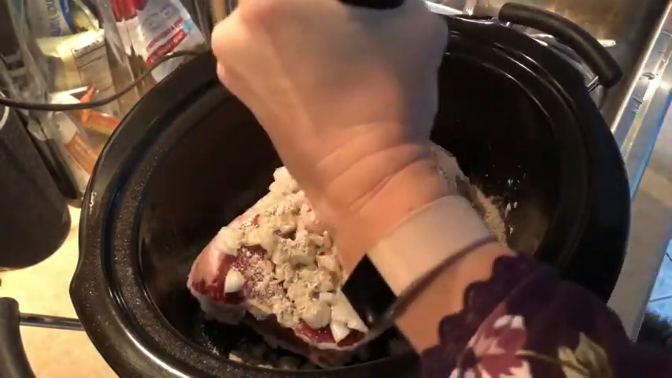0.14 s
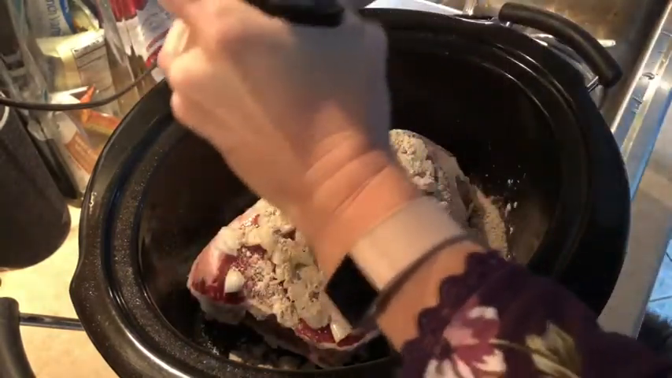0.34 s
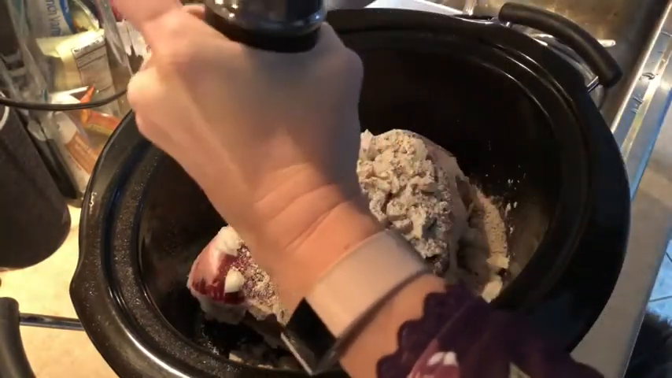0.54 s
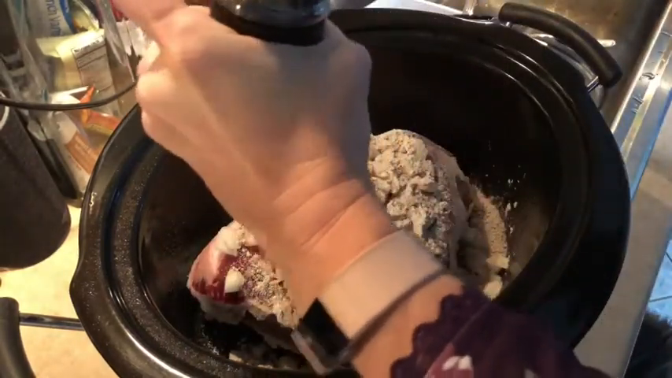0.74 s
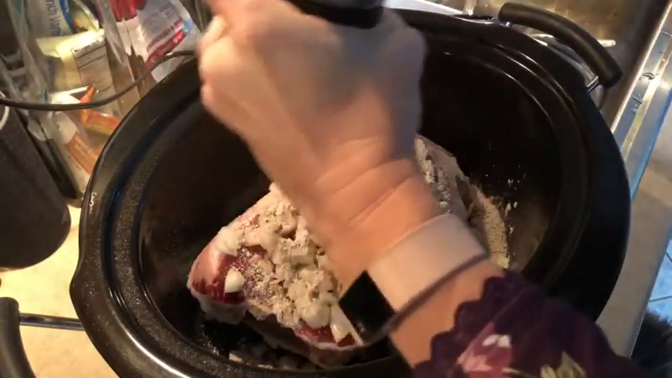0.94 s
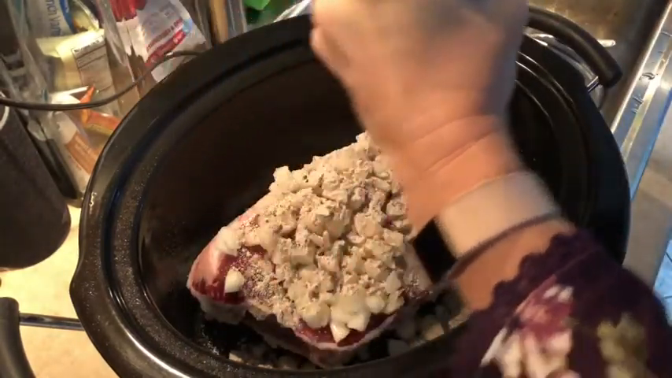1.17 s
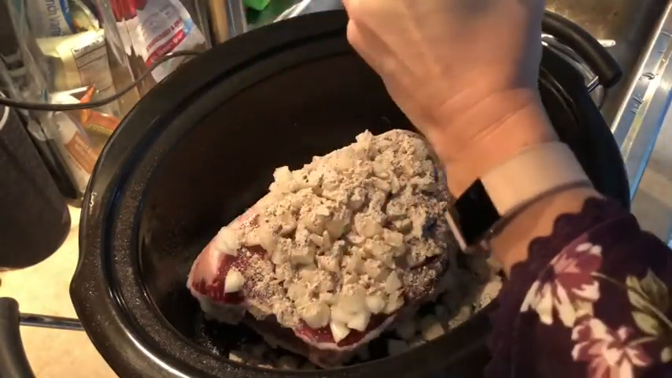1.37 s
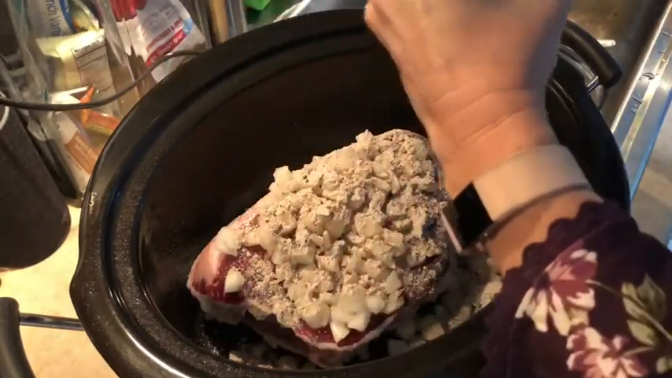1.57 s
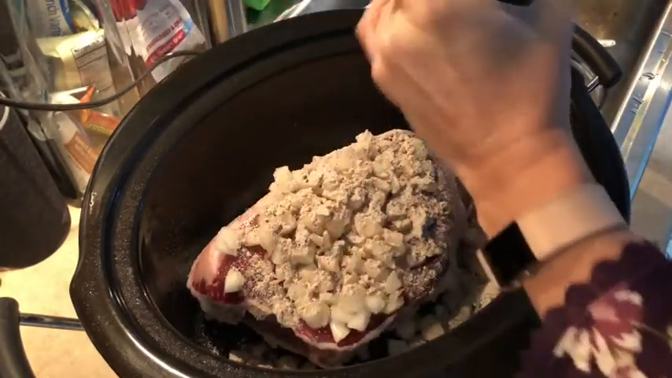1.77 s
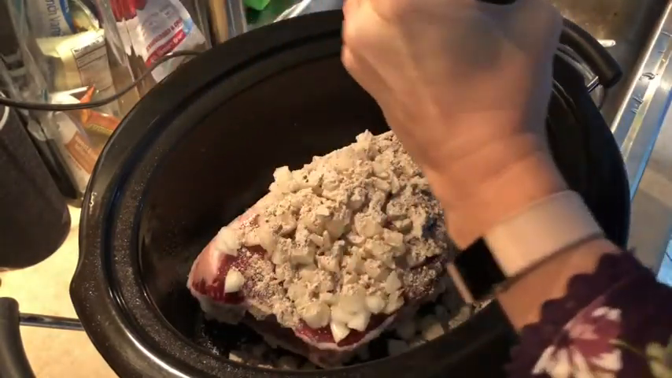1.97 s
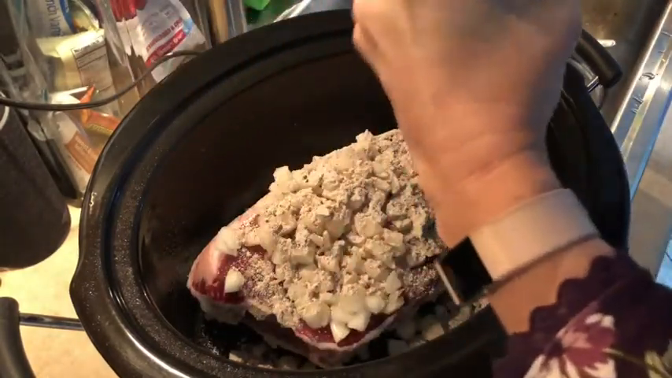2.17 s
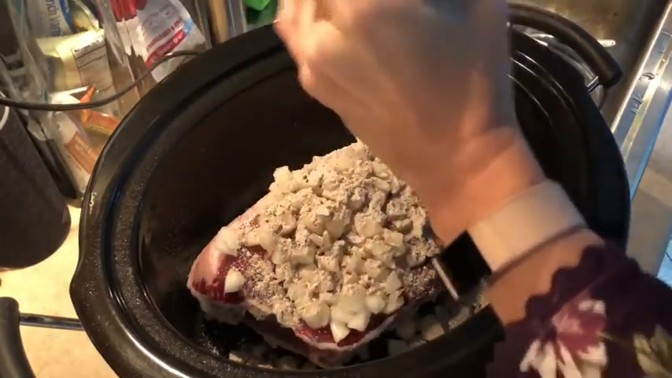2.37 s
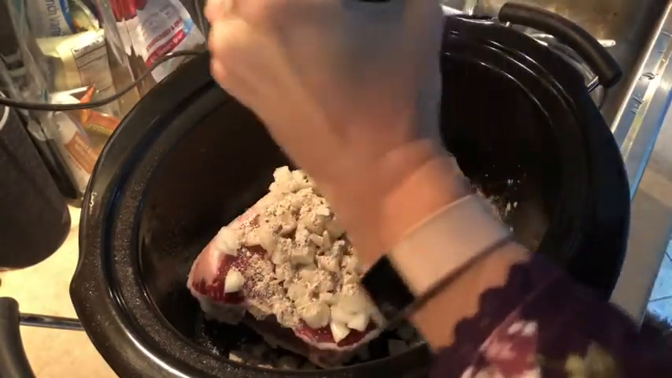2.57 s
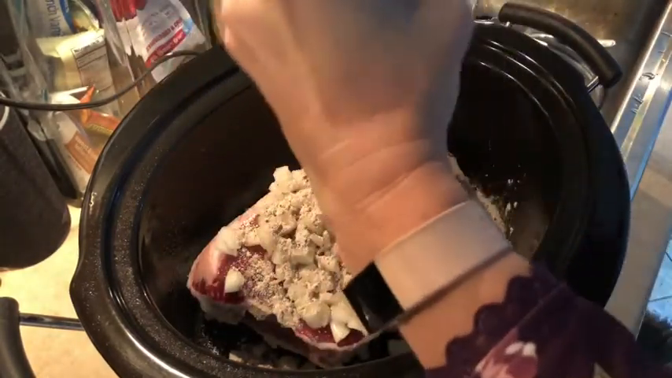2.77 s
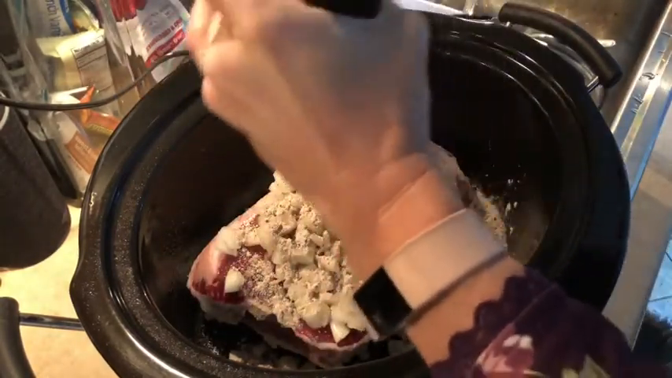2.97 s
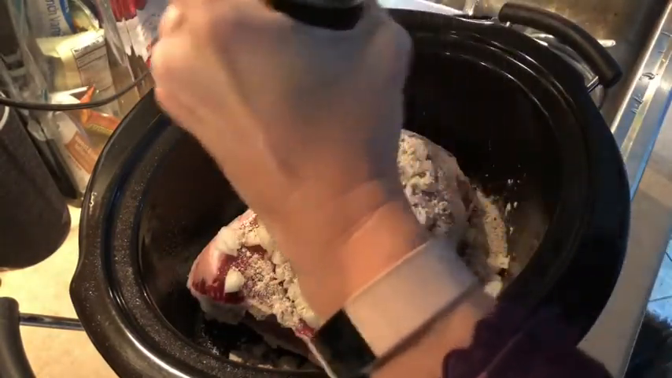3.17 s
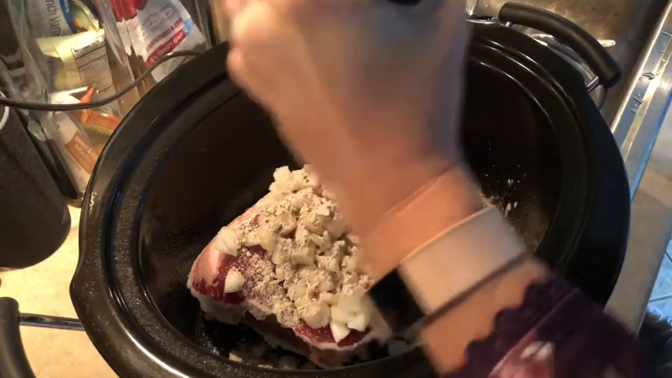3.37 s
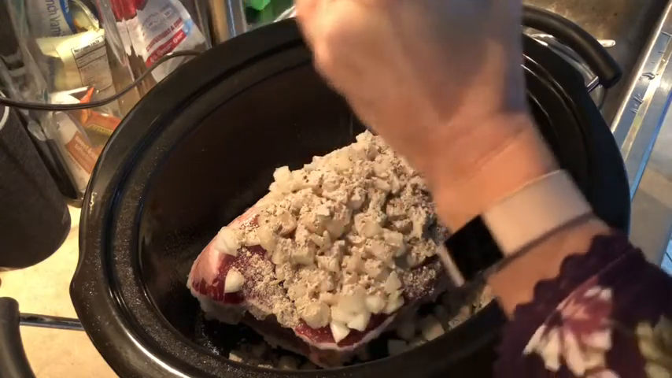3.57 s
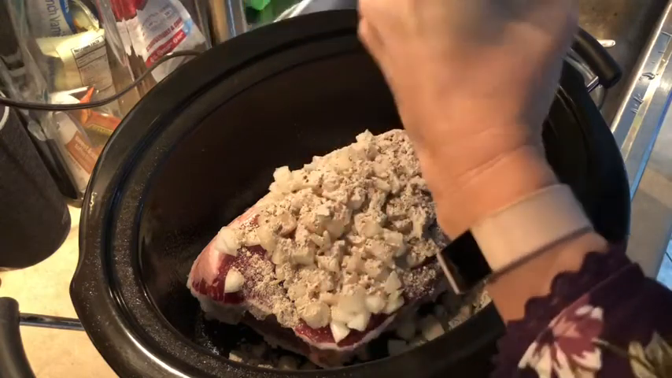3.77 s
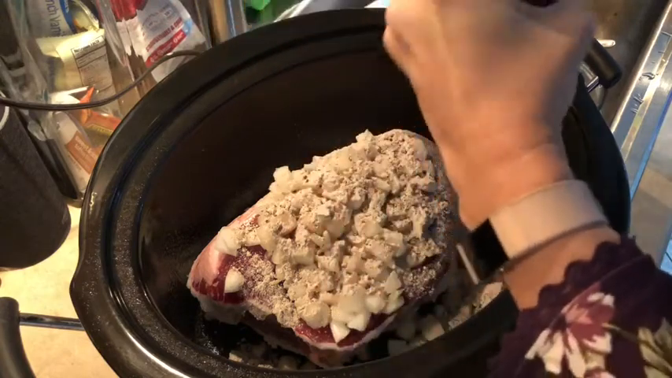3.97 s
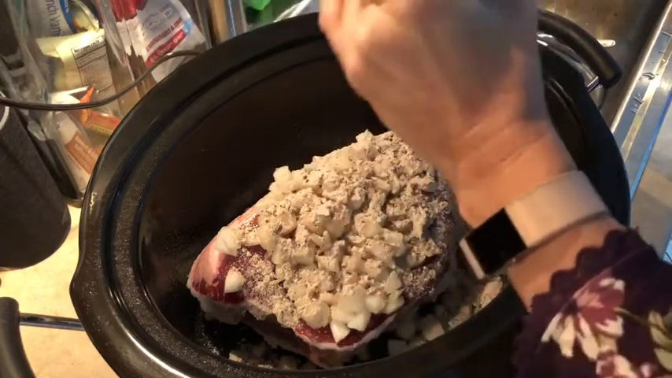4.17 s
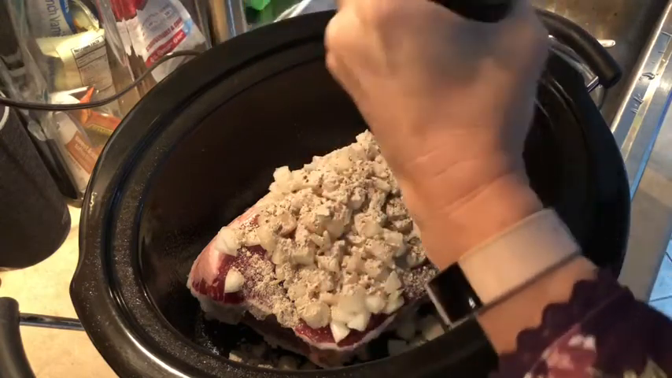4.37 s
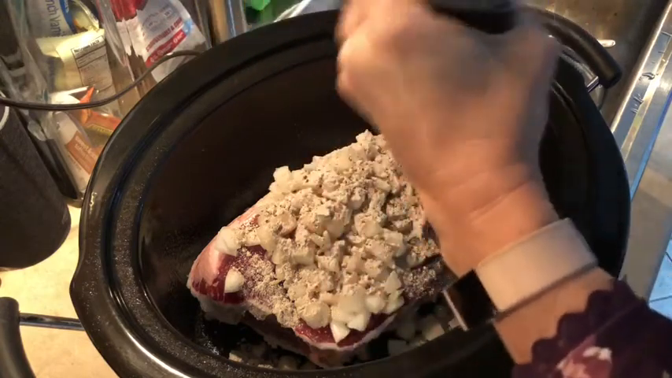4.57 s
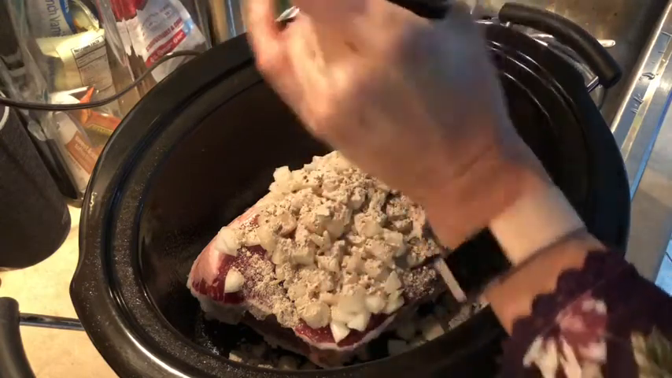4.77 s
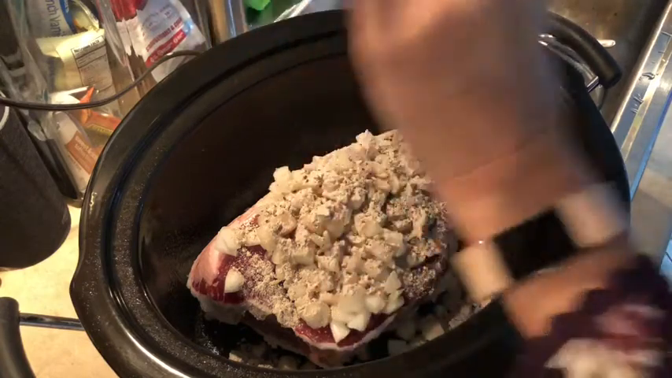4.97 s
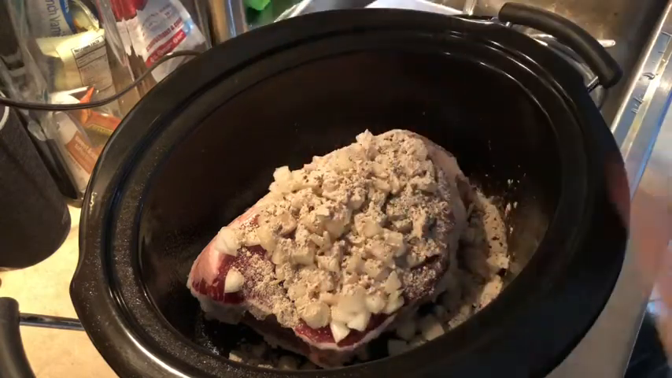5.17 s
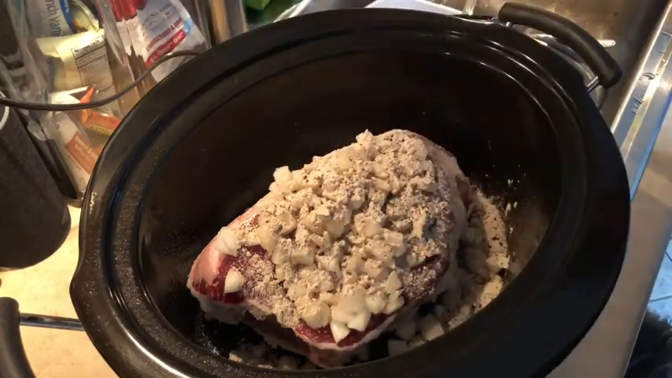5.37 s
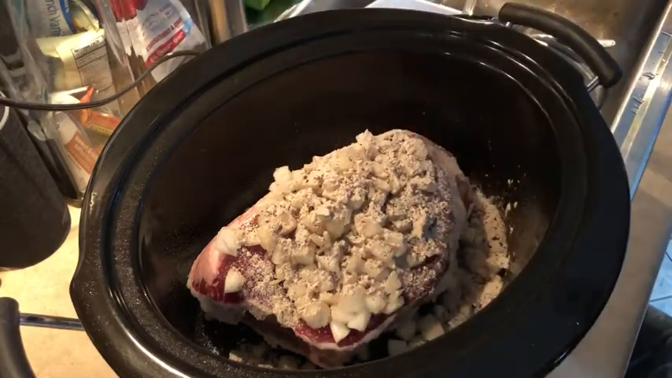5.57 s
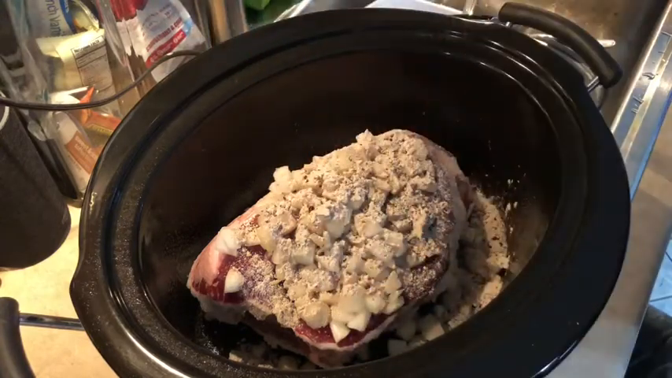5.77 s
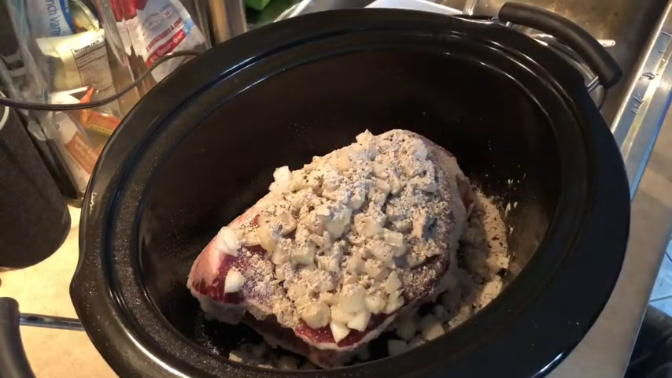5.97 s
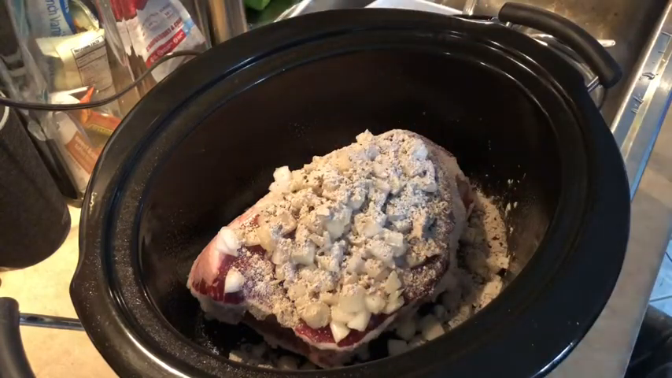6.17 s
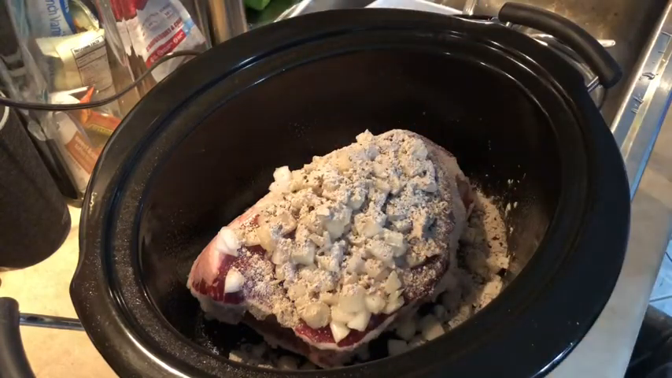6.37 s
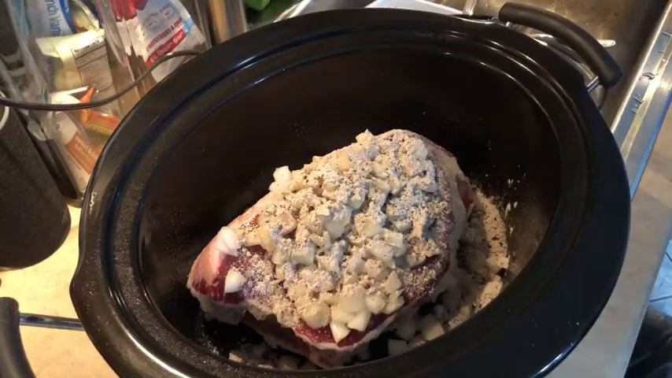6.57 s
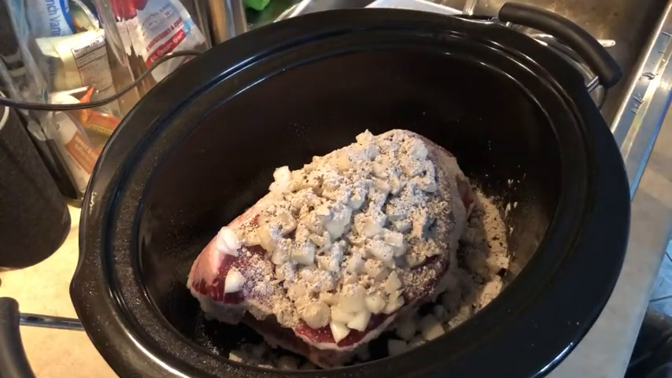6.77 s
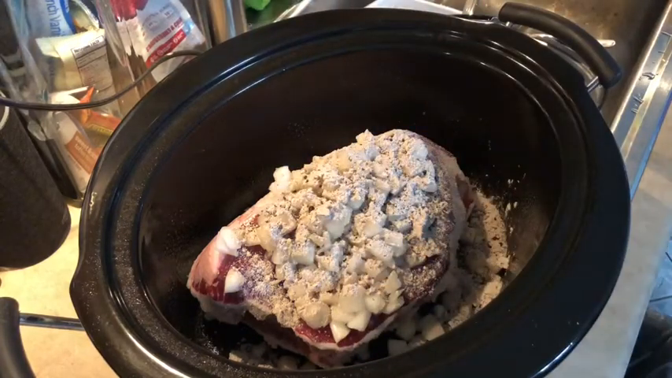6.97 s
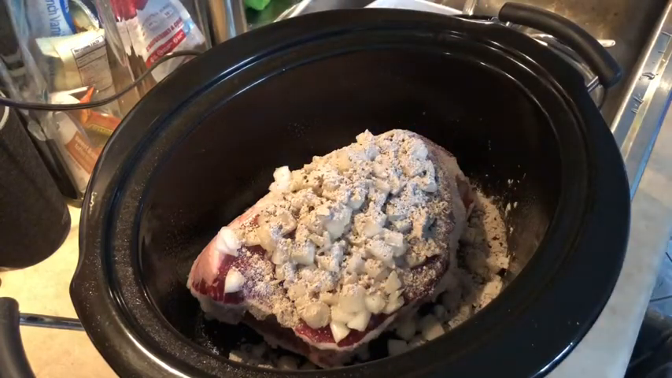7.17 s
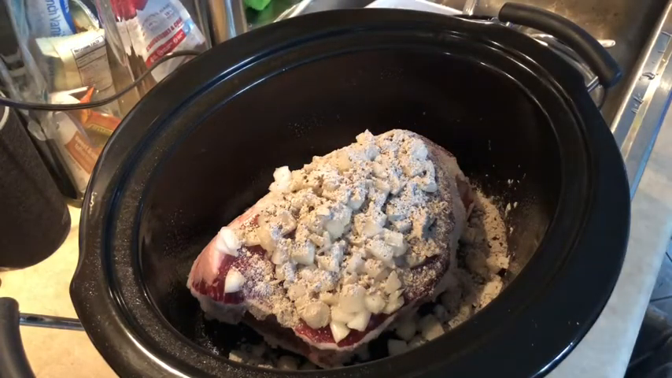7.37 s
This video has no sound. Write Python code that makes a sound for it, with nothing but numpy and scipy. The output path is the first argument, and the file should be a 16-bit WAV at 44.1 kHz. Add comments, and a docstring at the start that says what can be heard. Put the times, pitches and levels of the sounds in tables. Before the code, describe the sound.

A hand pepper mill grinds in quick, gritty, crackling twists, then is set down on a counter with light knocks in a quiet kitchen.

```python
"""Pepper mill in a quiet kitchen

A hand mill is twisted in short strokes over a pot. Brittle fracture of the corns in the burr gives
dense grit and louder cracks, coloured by the resonances of the hollow body. The mill is lifted away,
loose corns slide inside it, hand and arm bump softly, and it knocks down on the counter.
A fridge hums faintly under the short reverberation of the room."""
import sys
import numpy as np
from scipy import signal
from scipy.fft import rfft, irfft
from scipy.io import wavfile

SR = 44100
rng = np.random.default_rng(int(sys.argv[2]) if len(sys.argv) > 2 else 0)


def generate_wav(sig):
    """Save sig (samples, or channels by samples) to the path in sys.argv[1] as 16-bit PCM at SR."""
    pcm = np.round(np.clip(np.atleast_2d(sig).T, -1, 1) * 32767).astype(np.int16)
    wavfile.write(sys.argv[1], SR, pcm)


N = 327222
BANDS_HZ = np.geomspace(110, 15500, 22)


def from_db(db):
    """Amplitude ratio of a level: a factor of ten per 20 dB."""
    return 10 ** (np.asarray(db) / 20)


def unit_rms(x):
    """Normalisation to a mean power of one."""
    return x / np.sqrt(np.mean(x ** 2) + 1e-30)


def at_hz(curve, hz):
    """Interpolation of (frequency, value) points on a logarithmic frequency axis."""
    frequencies, values = np.transpose(curve)
    return np.interp(np.log(hz), np.log(frequencies), values)


def drift(rate_hz):
    """Slow random fluctuation of unit RMS: noise through a two-pole low-pass."""
    pole = np.exp(-2 * np.pi * rate_hz / SR)
    return unit_rms(signal.lfilter([1], [1, -2 * pole, pole * pole], rng.standard_normal(N)))


def band(x, hz, octaves=0.2):
    """Band-pass filtering, reaching the given octaves either side of the centre."""
    edges = [hz * 2 ** -octaves, min(hz * 2 ** octaves, .45 * SR)]
    return signal.sosfilt(signal.butter(2, edges, "band", fs=SR, output="sos"), x + 1e-18)


def resonate(x, modes):
    """Modal resonance: each damped mode changes the gain near its natural frequency."""
    out = x.copy()
    for hz, width_hz, gain_db in modes:
        radius = np.exp(-np.pi * width_hz / SR)
        feedback = [1, -2 * radius * np.cos(2 * np.pi * hz / SR), radius ** 2]
        ringing = signal.lfilter([1, 0, -1], feedback, x) * (1 - radius ** 2) / 2
        out += (from_db(gain_db) - 1) * ringing
    return out


# Spectrum of the room's air noise: (frequency [Hz], relative density [dB])
AIR_SPECTRUM = [(15, -39), (25, -25), (53, -1.5), (83, -4.5), (154, -9.5), (208, -7), (245, -20.5),
                (273, -12), (358, -14), (669, -21.5), (12900, -38.5), (16500, -37)]

def air_noise(level_db=-64):
    """Stationary noise: a white spectrum weighted towards the bass."""
    hz = np.maximum(np.arange(N // 2 + 1) * SR / N, 1)
    spectrum = rfft(rng.standard_normal(N)) * from_db(at_hz(AIR_SPECTRUM, hz))
    return from_db(level_db) * unit_rms(irfft(spectrum, N))


# Partials of the fridge motor: (frequency [Hz], RMS level [dB])
FRIDGE_PARTIALS = [(60, -72.5), (120, -82), (240, -73), (360, -77), (480, -83.5)]

def fridge_hum(waver_db=2.0, waver_hz=3.3):
    """Periodic vibration of a motor gives harmonics; each wavers in level."""
    t = np.arange(N) / SR
    return sum(np.sqrt(2) * from_db(db + waver_db * drift(waver_hz)) * np.sin(2 * np.pi * hz * t)
               for hz, db in FRIDGE_PARTIALS)


# Reverberation time of the kitchen: (frequency [Hz], T60 [s])
KITCHEN_T60 = [(150, 0.2), (1000, 0.33), (3000, 0.39), (8000, 0.45), (15000, 0.21)]

def reverberation(x, gap_s=0.0021):
    """Diffuse field: convolution with noise that decays exponentially, band by band."""
    t = np.arange(SR // 2) / SR
    response = sum(band(rng.standard_normal(len(t)), hz) * from_db(-60 * t / at_hz(KITCHEN_T60, hz))
                   for hz in BANDS_HZ)
    response *= np.clip(t / gap_s - 1, 0, 1)
    return signal.fftconvolve(x, response / np.sqrt(np.sum(response ** 2)))[:N]


# Bumps of hand and arm: (time [s], level [dB], centre frequency [Hz], T60 [s])
ARM_BUMPS = [(5.563, -45, 432, 0.14), (5.6, -39, 288, 0.074), (5.627, -41.5, 161, 0.077),
             (6.079, -45, 333, 0.13), (6.091, -43, 59.7, 0.18), (6.12, -49, 41.7, 0.36),
             (6.379, -46.5, 203, 0.11)]

def arm_bumps(rise_s=0.0023):
    """Soft impact: flesh excites mainly low frequencies, heard as a damped puff of noise."""
    out = np.zeros(N)
    for start_s, level_db, hz, t60 in ARM_BUMPS:
        t = np.arange(N - round(start_s * SR)) / SR
        puff = unit_rms(band(rng.standard_normal(N), hz, octaves=0.64)[:len(t)])
        envelope = from_db(level_db - 60 * t / t60) * np.minimum(t / rise_s, 1)
        out[-len(t):] += envelope * puff
    return out


def impacts(events, spectrum, gain_db, neutral_db, crumble, crumble_s=0.0025, lag_cycles=1.236):
    """Dispersion: low frequencies travel slower and arrive later. Returns clicks and their noise tails."""
    size, scatter_hz = 4096, np.geomspace(100, 16000, 12)
    t = np.arange(size) / SR
    hz = np.maximum(np.arange(size // 2 + 1) * SR / size, 20)
    dispersion = np.exp(-2j * np.pi * lag_cycles * np.log(hz / 20000))   # delay = lag_cycles / hz
    out = np.zeros((2, N + size))
    for start_s, peak_db, *colour_db in events:
        bass, middle, treble = np.array(colour_db) - neutral_db
        tone_db = at_hz([(400, bass), (1300, middle), (3500, 0), (4600, 0), (11000, treble)], hz)
        click = t == 0
        tail = crumble * rng.standard_normal(size) * np.exp(-t / crumble_s)
        scatter_db = 1.5 * np.interp(np.log(hz), np.log(scatter_hz), rng.standard_normal(len(scatter_hz)))
        response = from_db(at_hz(spectrum, hz) + tone_db + scatter_db) * dispersion
        impact = irfft(rfft([click, tail]) * response, size)
        impact *= from_db(peak_db + gain_db) / np.abs(impact.sum(axis=0)).max()
        start = round((start_s + .0013) * SR)
        out[:, start:start + size // 2] += impact[:, :size // 2]
    return out[:, :N]


# The mill meets the counter: (time [s], relative peak [dB], bass [dB], middle [dB], treble [dB])
COUNTER_KNOCKS = [(6.206, -23, -9, -9.5, -18), (6.377, -30.5, -14, -7, -16.5), (6.585, -22, -13, -7, -47),
                  (7.352, -50, -38, -15, -24)]
# Spectrum of a knock: (frequency [Hz], relative density [dB])
KNOCK_SPECTRUM = [(59, -44.5), (100, -22), (210, 1), (283, -13), (350, -3), (608, 1), (872, 3.5),
                  (950, 5.5), (1420, 4.5), (1550, 5.5), (2040, 5), (3780, 4), (14700, -10.5), (16000, -20)]
# Modes that ring under a knock: (frequency [Hz], bandwidth [Hz], gain [dB])
COUNTER_MODES = [(203, 37, 5.5), (625, 52, 4), (940, 68, 3.5), (1550, 60, 1), (2400, 170, 4),
                 (3920, 270, 0.5)]

def counter_knocks():
    """Impact excitation: the mill sets the counter's modes ringing. Returns knocks and their rattle."""
    knocks, rattle = impacts(COUNTER_KNOCKS, KNOCK_SPECTRUM, gain_db=1,
                             neutral_db=[-20, -8, -20], crumble=0.21)
    return resonate(knocks, COUNTER_MODES), resonate(rattle, COUNTER_MODES)


# The burr catches and jolts the mill: (time [s], relative rumble level [dB], T60 [s])
BURR_JOLTS = [(0.148, -52, 0.13), (0.213, -36.5, 0.12), (0.264, -27, 0.085), (0.718, -28.5, 0.14),
              (0.816, -36, 0.089), (1.222, -31, 0.11), (1.266, -40, 0.13), (1.649, -40.5, 0.083),
              (1.702, -39, 0.11), (1.747, -33, 0.14), (2.278, -33, 0.12), (2.832, -36.5, 0.19),
              (2.943, -32, 0.098), (3.371, -32.5, 0.11), (3.463, -39, 0.12), (3.99, -42, 0.18),
              (4.062, -39.5, 0.16), (4.48, -61, 0.082), (4.642, -38, 0.2), (4.81, -36, 0.12),
              (4.866, -44, 0.11), (5.062, -53, 0.13)]

def jolt_bass_db(time, force_db, rise_s=.004, calm_db=-6):
    """Transient response: each jolt of the body lifts the bass of the grit, then decays exponentially."""
    start_s, level_db, t60 = np.transpose(BURR_JOLTS)[:, :, None]
    age = np.maximum(time - start_s, 0)
    jolts = from_db(level_db - 60 * age / t60) * np.minimum(age / rise_s, 1)
    rumble_to_grit = from_db(11) * jolts.sum(axis=0) / from_db(np.maximum(force_db, -55))
    return 20 * np.log10(from_db(calm_db) + rumble_to_grit)


# Force of the hand as grit level, one list per twist: (time [s], relative level [dB])
TWISTS = [
    [(0.0, -41.5), (0.014, -48.5), (0.018, -42.5), (0.064, -56.5), (0.074, -53.5), (0.094, -68.5),
     (0.1, -70)],
    [(0.1, -64), (0.126, -48.5), (0.14, -53), (0.156, -34.5), (0.256, -39), (0.264, -28.5), (0.392, -34.5),
     (0.596, -48), (0.606, -43)],
    [(0.616, -34.5), (0.638, -37.5), (0.71, -38), (0.722, -34.5), (0.816, -31.5), (0.952, -41),
     (0.958, -50), (0.992, -47), (1.08, -78.5)],
    [(1.08, -65.5), (1.118, -41), (1.192, -37), (1.254, -32.5), (1.386, -32), (1.406, -43.5),
     (1.414, -37.5), (1.566, -61), (1.58, -77)],
    [(1.58, -70.5), (1.608, -46), (1.648, -47.5), (1.656, -41), (1.802, -29.5), (1.944, -44), (2.03, -40),
     (2.054, -48), (2.125, -56.5)],
    [(2.138, -49.5), (2.148, -36.5), (2.16, -42), (2.178, -40.5), (2.194, -38.5), (2.212, -36),
     (2.234, -44), (2.268, -38.5)],
    [(2.285, -23), (2.291, -32.5), (2.323, -27.5), (2.391, -40), (2.527, -27.5), (2.607, -40.5),
     (2.673, -47), (2.683, -51), (2.765, -60)],
    [(2.779, -42.5), (2.891, -32.5), (2.909, -39.5), (2.951, -27.5), (2.997, -37.5), (3.095, -39),
     (3.103, -43), (3.159, -50), (3.195, -58.5)],
    [(3.207, -36.5), (3.229, -44), (3.253, -38.5), (3.341, -43.5), (3.375, -34.5), (3.457, -39.5),
     (3.485, -29.5), (3.489, -31), (3.7, -51)],
    [(3.713, -41.5), (3.755, -44), (3.759, -40.5), (3.771, -46.5), (3.853, -41), (3.863, -51.5),
     (3.891, -48.5), (3.917, -44), (3.978, -52.5)],
    [(3.99, -42), (4.004, -34.5), (4.014, -37), (4.112, -38.5), (4.116, -33), (4.256, -36), (4.306, -46.5),
     (4.342, -42.5), (4.4, -50)],
    [(4.4, -50.5), (4.418, -47), (4.424, -37), (4.444, -50), (4.498, -36), (4.558, -45.5), (4.568, -41),
     (4.614, -56), (4.62, -50.5)],
    [(4.634, -34), (4.8, -39), (4.816, -33), (4.858, -38), (4.868, -32), (4.876, -37), (4.978, -59),
     (4.986, -50), (5.04, -50.5)],
    [(5.04, -54.5), (5.07, -35.5), (5.08, -40.5), (5.104, -29.5), (5.138, -38.5), (5.16, -40),
     (5.172, -43.5), (5.258, -55), (5.33, -52.5)],
]
# Loose corns in the lifted mill, one list per slide: (time [s], relative level [dB])
CORN_SLIDES = [
    [(5.33, -56), (5.34, -46), (5.39, -37), (5.57, -54), (5.64, -66), (5.65, -57)],
    [(5.65, -56), (5.706, -49), (5.884, -58.5), (5.904, -48), (5.976, -47), (6.07, -72)],
    [(6.07, -64), (6.076, -60.5), (6.118, -68), (6.134, -58), (6.146, -63.5), (6.195, -63.5)],
    [(6.46, -68), (6.53, -64), (6.568, -58), (6.58, -55.5)],
    [(6.66, -51), (6.804, -63), (6.888, -76), (6.924, -65.5), (6.932, -72), (7.05, -80)],
    [(7.3, -80), (7.348, -85), (7.352, -65), (7.364, -62), (7.398, -67), (7.42, -82)],
]
# Brightness of each twist, then of each slide: (treble gain [dB])
GESTURE_TREBLE = [-1, 0.5, 1, 1, 3, 0.5, 0, 1.5, 3, 2, 2.5, 0.5, 1, 5, 4, 5, 1, -2, 4.5, -0.5]

def excitation(time, crushing, firm_db=-36, treble_per_db=0.55):
    """The driving force sets level and treble, both in dB: harder grinding is louder and brighter."""
    force_db, treble_db = np.full(len(time), -99.), np.zeros(len(time))
    for gesture, brightness_db in zip(TWISTS + CORN_SLIDES, GESTURE_TREBLE):
        times, levels_db = np.transpose(gesture)
        active = (time >= times[0]) & (time <= times[-1] + .03)
        force_db[active] = np.interp(time[active], times, levels_db)
        treble_db[active] = brightness_db
    return force_db, treble_db + treble_per_db * (force_db - firm_db) * crushing


# Spectrum of breaking and sliding corns: (frequency [Hz], relative density [dB])
CORN_SPECTRUM = [(59, -41), (100, -14), (202, -4), (302, -13), (535, -6), (1080, -2), (1250, 0.5),
                 (2000, -1), (2580, 1), (4670, 1.5), (8460, -4), (16000, -22)]

def grit(max_per_s=9000, colour_db=7.5, clump_db=2.5, clump_hz=56):
    """Shot noise: tiny fractures and sliding contacts in clumps, each with its own size and colour."""
    onsets = np.flatnonzero(rng.random(N) < max_per_s / SR)
    time, count = onsets / SR, len(onsets)
    crushing = time < TWISTS[-1][-1][0]
    force_db, treble_db = excitation(time, crushing)
    bass_db = jolt_bass_db(time, force_db)
    spread_db = np.where(crushing, 2.2, 1.6)   # crushed corns are more uneven than sliding ones
    size_db = spread_db * np.minimum(rng.exponential(1, count), 5)
    size_db += clump_db * drift(clump_hz)[onsets]
    chance = np.where(crushing, np.clip(from_db(force_db + 33), .06, 1), 1)   # a slow burr ticks sparsely
    sounding = rng.random(count) < chance
    pulses = from_db(size_db) * sounding / np.sqrt(chance) * rng.choice([-1, 1], count)
    out = np.zeros(N)
    for hz in BANDS_HZ:
        bass_share = np.clip(np.log2(1300 / hz), 0, 1)
        treble_share = np.clip(np.log2(hz / 5500) * 5.6, 0, 1)
        level_db = force_db + at_hz(CORN_SPECTRUM, hz) + bass_share * bass_db + treble_share * treble_db
        colour = from_db(colour_db * np.clip(rng.standard_normal(count), -2, 2))
        grains = np.zeros(N)
        grains[onsets] = unit_rms(pulses * colour) * from_db(level_db)
        out += band(grains, hz)
    return from_db(13.5) * out


# Corns that crack audibly: (time [s], relative peak [dB], bass [dB], middle [dB], treble [dB])
CORN_CRACKS = [(0.1047, -32, -30, -25, -13), (0.1236, -28, -28, -25, -18), (0.1553, -20.5, -28, -19, -12),
               (0.1715, -11.5, -50, -30, -14), (0.2628, -17, -20, -9, -21), (0.2864, -14, -37, -15, -10),
               (0.416, -19, -37, -25, -19), (0.614, -18, -31, -24, -25), (0.7287, -12, -32, -10, -9),
               (0.809, -15.5, -34, -29, -29), (1.0937, -40, -28, -12, -27), (1.1198, -23, -29, -19, -34),
               (1.2126, -22.5, -24, -18, -20), (1.2616, -11, -14, -19, -6), (1.31, -10, -42, -30, -21),
               (1.4145, -12.5, -57, -40, -15), (1.5926, -36.5, -32, -36, -21), (1.6575, -27, -26, -20, -16),
               (1.7439, -14, -29, -16, -22), (1.7792, -19, -43, -24, -20), (2.023, -19, -40.5, -23, -23),
               (2.145, -32, -37.5, -16, -17), (2.242, -25, -8, -9, 9), (2.2784, -1.5, -16.5, -16.5, -9.5),
               (2.324, -11.5, -31, -31, -13), (2.355, -12, -37, -23, -16), (2.402, -12, -42, -31, -5),
               (2.4224, -15, -41, -36, -13), (2.445, -12.5, -62, -42, -20.5),
               (2.4748, -16.5, -40, -22, -18), (2.512, -5, -48, -24.5, -19), (2.6499, -18, -42, -21, -11),
               (2.666, -18, -51, -41, -38), (2.686, -40, -36, -33, -36.5), (2.777, -25, -33, -16.5, -13),
               (2.8025, -28, -29, -27, -16.5), (2.833, -21, -19, -15, -13), (2.9238, -13.5, -19, -14, -25),
               (2.9458, -10, -37, -25, -15), (3.029, -23, -43, -19, -17), (3.2061, -26, -26, -18, -24),
               (3.2906, -16, -38, -27, -20), (3.3886, -17, -32, -10, -9), (3.447, -20, -23, -17, -12),
               (3.4816, -7.5, -27.5, -21, -38), (3.6721, -22.5, -42, -30, -2), (3.7118, -26, -38, -15, -17),
               (3.7823, -27, -32, -16, -17), (3.9866, -20.5, -13.5, -16, -10),
               (4.0009, -12.5, -53, -7, -34), (4.0633, -21.5, -32, -11, -16), (4.116, -14.5, -24, -17, -9),
               (4.135, -15.5, -18.5, -24, -9), (4.1744, -15, -44, -28, -11), (4.2343, -23, -47, -26, -29),
               (4.4034, -30.5, -32, -13, -13), (4.4223, -25, -38, -24, -20), (4.4789, -23, -15, -31, -17),
               (4.6307, -19, -20, -14, -18), (4.6537, -15, -27.5, -23, -14), (4.7298, -21, -15, -22, -18),
               (4.8118, -17.5, -6, -5, -24), (4.8659, -9.5, -24, -9, -39.5), (4.9861, -40, -29, -25, -15),
               (5.0102, -27, -34, -35, -15), (5.0586, -29, -14, -27, -15), (5.0672, -26, -36, -22, -8),
               (5.1008, -13, -28, -28, -4), (5.4713, -21.5, -43, -43, 1), (5.908, -31, -26, -26, -21)]

def cracks():
    """Brittle fracture: a corn gives way with a sharp click and a short crumble."""
    clicks, crumbs = impacts(CORN_CRACKS, CORN_SPECTRUM, gain_db=-3,
                             neutral_db=[-28, -18, -16], crumble=0.18)
    return clicks + crumbs


# Modes of the mill's hollow body: (frequency [Hz], bandwidth [Hz], gain [dB])
MILL_MODES = [(202.5, 16, 6), (370, 63, 3.5), (768, 120, 4), (1039, 31, 3.5), (1566, 61, 3),
              (1924, 225, 4.5), (2600, 240, -0.5), (3880, 640, 2)]

def pepper_mill():
    """Source and filter: cracks and grit excite the resonances of the hollow body."""
    return resonate(cracks() + grit(), MILL_MODES)


def scene():
    """Superposition of direct sound, reverberation and background, in one channel."""
    mill = pepper_mill()
    knocks, rattle = counter_knocks()
    arm = arm_bumps()
    direct = mill + knocks + rattle + arm
    into_room = from_db(-15) * mill + from_db(8) * knocks + from_db(-9) * arm
    return (direct + reverberation(into_room) + air_noise() + fridge_hum())[None]


def record(dry, stopband_hz=16800):
    """Band limiting: a steep low-pass removes the highest treble."""
    return signal.sosfilt(signal.cheby2(14, 70, stopband_hz, fs=SR, output="sos"), dry)


dry = scene()
out = record(dry)
generate_wav(out)
```